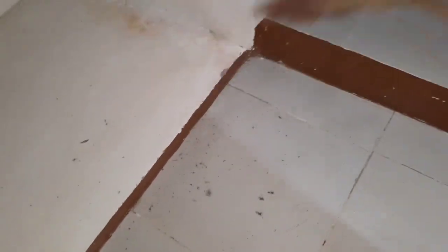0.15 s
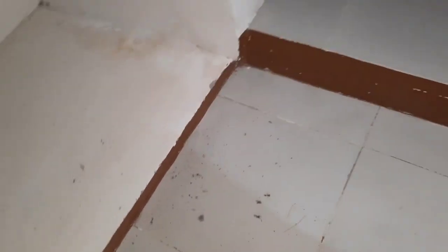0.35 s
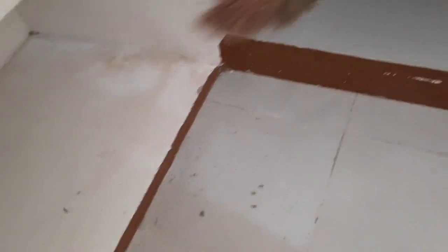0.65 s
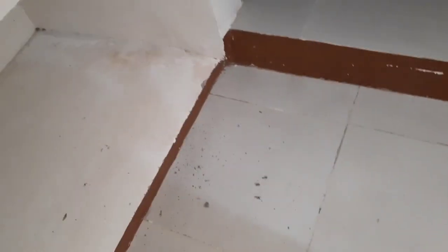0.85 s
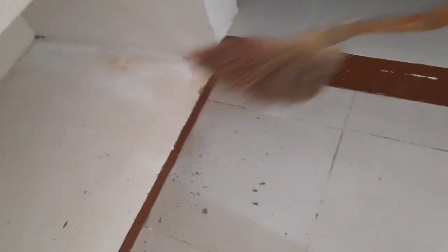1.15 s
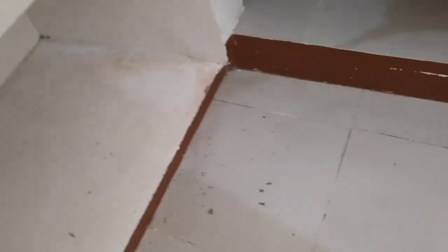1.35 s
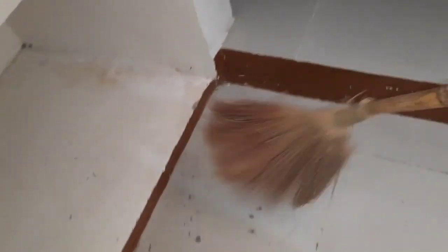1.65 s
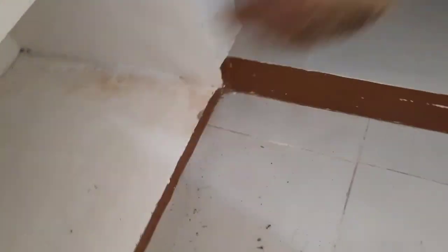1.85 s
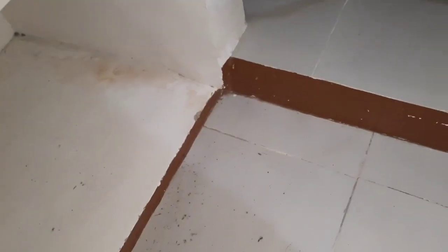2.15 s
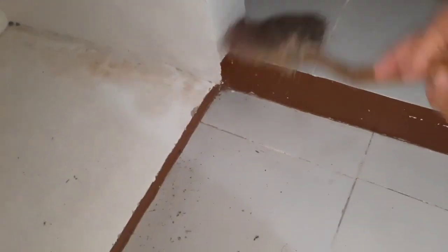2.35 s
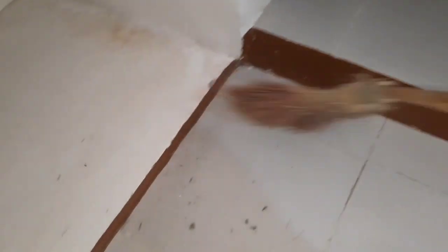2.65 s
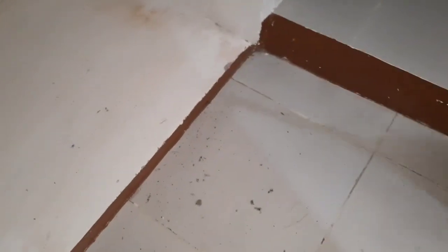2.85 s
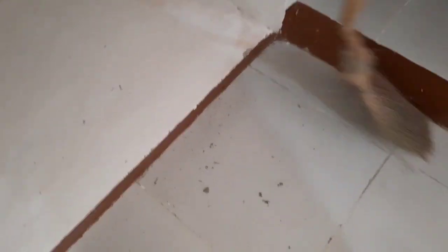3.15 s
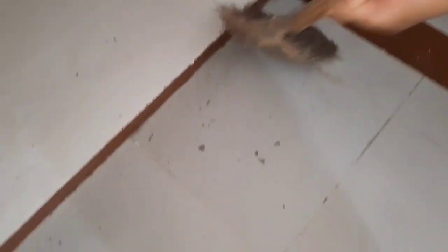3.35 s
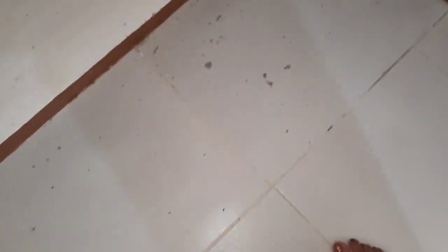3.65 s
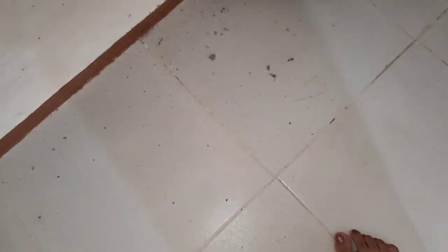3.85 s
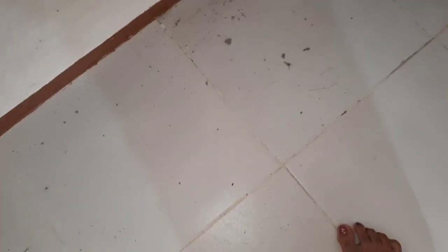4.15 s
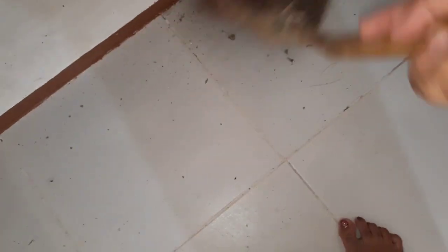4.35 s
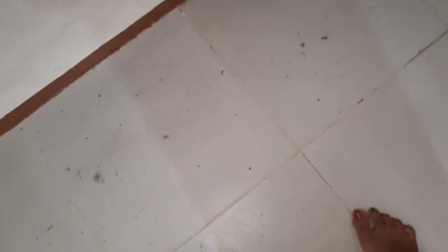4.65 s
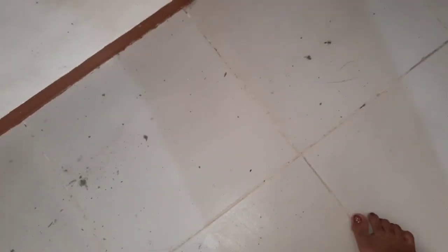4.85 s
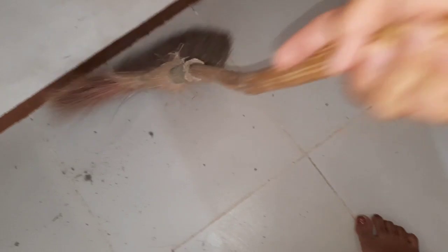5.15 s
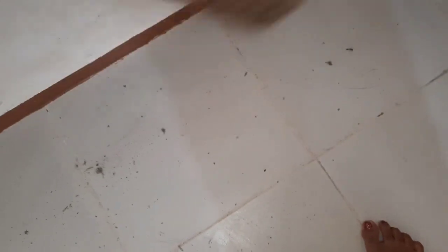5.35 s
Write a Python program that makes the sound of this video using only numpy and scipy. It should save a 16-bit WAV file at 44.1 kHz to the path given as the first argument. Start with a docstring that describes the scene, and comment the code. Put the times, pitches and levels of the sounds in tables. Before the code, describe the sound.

Uneven hissing broom strokes on tiles in a bare, reverberant room, with hollow wooden clicks and dull handling thumps close to the microphone.

```python
"""A small, bare room with a tiled corner, where a soft grass broom sweeps in uneven strokes.
Slipping fibre tips make a bright hiss (filtered noise) over a low murmur; the broom head pats down once.
The hollow handle clicks and creaks and stalks snap (decaying sines), and the room echoes (decaying noise).
The hand that holds the phone bumps and rubs beside its right microphone, over quiet house noise."""
import sys
import numpy as np
from scipy import signal
from scipy.fft import rfft, irfft
from scipy.io import wavfile

SR = 44100
rng = np.random.default_rng(int(sys.argv[2]) if len(sys.argv) > 2 else 0)


def store_wav(level_fs):
    """Save 16-bit WAV to argv[1]."""
    pcm = np.round(np.clip(np.atleast_2d(level_fs), -1, 1) * 32767)
    wavfile.write(sys.argv[1], SR, pcm.T.astype(np.int16))


N = 242978
T = np.arange(N) / SR  # time [s]

# Broom strokes, each with a steady drag and a push: (touch-down [s], contact length [s], drag level [dB],
# push middle after touch-down [s], push width [s], push level [dB], brightness [dB],
# murmur relative to drag and push [dB])
STROKE_TABLE = [ (-.02, 0.048, -50.5, 0.024, 0.0093, -48.5, -3.5, -21),
                (.421, 0.16, -55.5, 0.21, 0.09, -50, 0.5, -25),
                (.863, 0.15, -60, 0.19, 0.074, -48, -1, -17.5),
                (1.262, 0.039, -67, 0.015, 0.024, -59, -5.5, -43),
                (1.402, 0.24, -53, 0.22, 0.071, -44, 1.2, -18.5),
                (2.073, 0.44, -48.5, 0.3, 0.061, -42.5, .8, -14),
                (2.921, 0.29, -59.5, 0.21, 0.077, -40.5, 1.1, -18),
                (3.183, .25, -51, .12, 0.055, -41.5, -1, -13.5),
                (3.53, 0.046, -53, .025, .02, -56, 2.2, -20),
                (3.604, 0.3, -48.5, .01, 0.17, -44.5, .3, -28), (4.079, 0.15, -54, 0.081, .03, -58, 1, -19),
                (4.238, .26, -52.5, 0.16, .11, -43.5, 0.5, -17.5),
                (4.79, 0.047, -69, 0.029, 0.032, -58, 3.5, -9),
                (4.866, 0.42, -51.5, 0.23, 0.11, -43.5, -0.5, -26)]


def undb(db):
    """Level law: decibels to amplitude gain."""
    return 10 ** (np.asarray(db) / 20)


def unit(x):
    """Normalisation: scale to rms 1."""
    return x / np.sqrt(np.mean(x ** 2))


def fade(t, t60_s):
    """Exponential decay: amplitude falls by 60 dB in t60."""
    return np.exp(-np.log(1000) * t / t60_s)


def swell(t, width_s):
    """Gaussian envelope: a smooth rise and fall around t = 0."""
    return np.exp(-.5 * np.minimum((t / width_s) ** 2, 100))


def walk(rate):
    """Random modulation: straight lines join `rate` random values per second, spread near 1."""
    knots = rng.standard_normal(size=4000)
    return 1.2 * np.interp(T * rate, np.arange(len(knots)), knots)


def colour(x, points):
    """Spectral shaping: filter by (frequency [Hz], level [dB]) points on a log-frequency axis, to rms 1."""
    hz, db = np.transpose(points)
    f = np.maximum(np.fft.rfftfreq(x.shape[-1], 1 / SR), 1)
    gain = undb(np.interp(np.log(f), np.log(hz), db))
    return unit(irfft(rfft(x) * gain, x.shape[-1]))


def band(x, lo_hz, hi_hz):
    """Band-pass filtering: keep what lies between two frequencies."""
    return signal.sosfilt(signal.butter(2, [lo_hz, min(hi_hz, .48 * SR)], "band", fs=SR, output="sos"), x)


def lowpass(hz):
    """Second-order low-pass sections."""
    return signal.butter(2, hz, fs=SR, output="sos")


def ring(modes):
    """Modal synthesis: 0.1 s of decaying sines of (frequency [Hz], level [dB], t60 [s])."""
    t = T[:SR // 10]
    return sum(undb(db - 60 * t / t60) * np.sin(2 * np.pi * hz * t) for hz, db, t60 in modes)


def add(track, s, sound):
    """Superposition: mix a sound in at a time."""
    i = max(int(s * SR), 0)
    track[..., i:i + sound.shape[-1]] += sound[..., :N - i]


def room(x):
    """Diffuse reverberation of tiles and plaster, different at each microphone; the treble dies first."""
    t60_s, treble_t60_s, rise_s = .6, .45, 0.0017
    t, noise = T[:SR], rng.standard_normal((2, SR))
    low = signal.sosfilt(lowpass(4000), noise)
    tail = low * fade(t, t60_s) + (noise - low) * fade(t, treble_t60_s)
    tail *= np.minimum(t / rise_s, 1)
    return signal.fftconvolve(np.atleast_2d(x), unit(tail) / np.sqrt(SR), axes=1)[:, :N]


def standing_wave(x):
    """Room mode: low sounds build up a standing wave between the walls, alike at both microphones."""
    mode_hz, mode_t60_s, mode_db = 324, 0.35, 8
    t = T[:SR]
    decay = fade(t, mode_t60_s)
    mode = 2 * decay / decay.sum() * np.sin(2 * np.pi * mode_hz * t)
    return undb(mode_db) * signal.fftconvolve(x.mean(axis=0), mode)[:N]


def air(db, boom_db):
    """Partly correlated house noise; a narrow-band room resonance swells in it, alike at both microphones."""
    # Spectrum of the house noise: (frequency [Hz], level [dB])
    air_spectrum = [(15, -25), (30, 1.5), (60, 8), (120, 5), (200, -2.5), (320, 1), (480, -6), (800, -10),
                    (1300, -4), (2000, -13), (6000, -18), (15000, -19)]
    noise = rng.standard_normal((2, N)) + 0.74 * rng.standard_normal(N)
    boom = unit(band(rng.standard_normal(N), 300, 326)) * undb(boom_db + walk(4.8))
    return undb(db + .5 * walk(4.14)) * colour(noise, air_spectrum) + boom


def hand(leak_db):
    """Structure-borne sound: soft knocks and rubbing rumble reach the right microphone through the phone."""
    # The hand shifts its grip on the phone: (middle [s], width [s], level [dB])
    rubs = [(.45, 0.025, -54), (1.75, 0.13, -72), (2.147, 0.031, -37.5), (2.27, 0.049, -53.5),
            (2.6, 0.031, -48), (2.809, 0.081, -56), (3.232, .03, -40.5), (3.33, 0.033, -43.5),
            (3.76, 0.07, -37.5), (3.97, 0.053, -40.5), (4.11, 0.053, -43.5), (4.288, 0.032, -37.5),
            (4.52, 0.014, -43), (4.67, 0.053, -48), (4.892, 0.018, -42), (5.021, 0.02, -52),
            (5.409, 0.024, -50)]
    # The hand knocks the phone: (time [s], level before softening [dB], frequency [Hz])
    bumps = [(2.651, -20.5, 137), (2.679, -29.5, 72), (3.655, -27, 81), (3.722, -26.5, 122),
             (3.916, -22.5, 100), (4.573, -22, 94), (4.639, -28, 120), (4.677, -33.5, 117),
             (4.706, -29, 72)]
    # in periods of the knock: its rise and fall, and the rounding of its peak by the skin
    bump_cycles, bump_softness = 0.44, 0.1
    rumble = colour(rng.standard_normal(N), [
        (15, -62), (26, -29), (38, 0.5), (62, 9.5), (100, -1.5), (150, -9.5), (220, -29.5),
        (400, -30), (1000, -78)])
    rub_power = sum((undb(db) * swell(T - s, width)) ** 2 for s, width, db in rubs)
    right = rumble * np.sqrt(rub_power)
    for s, db, hz in bumps:
        cycles = hz * (T - s)
        envelope = np.exp(-np.hypot(cycles, bump_softness) / bump_cycles)
        right += undb(db) * envelope * np.sin(2 * np.pi * cycles)
    return np.array([undb(leak_db) * right, right])


def handle(room_db, left_db):
    """Stick-slip excites a resonator: each slip rings the hollow handle, with a crack, and chatters on.
    The handle is nearer the right microphone."""
    # Clicks and creaks: (time [s], level [dB], crack relative to click [dB], chatter t60 [s])
    clicks = [ (0.034, -39, -11, 0.033), (.094, -39, -7, 0.14), (1.269, -46.5, -11, 0.97),
              (2.294, -45.5, -22, 0.35), (2.337, -36.5, -25, 0.19), (2.437, -36.5, -28, 0.22),
              (2.746, -43.5, -3, 0.087), (3.399, -37, -23, 0.24), (3.458, -41, -26, .06),
              (3.621, -42.5, -13, .03), (3.852, -35.5, -25, 0.24), (3.872, -37, -33, 0.21),
              (4.075, -45, -26, 0.31), (4.125, -49, -20, 0.26), (4.42, -37.5, -22, 0.27),
              (4.875, -48, -16, 0.13), (5.154, -27, -26, .012), (5.3103, -27, -3, .011),
              (5.357, -48, -22, 0.067), (5.45, -49.5, 1.5, 0.077)]
    # Hollow modes, relative to the main ring: (frequency ratio [1], level [dB], t60 [s])
    hollow_modes = [(0.97, 2, 0.023), (1.042, -7.5, 0.036), (1.3, -7, 0.027)]
    # Sharp crack: (frequency [Hz], level [dB], t60 [s])
    crack_modes = [(2070, -3, 0.0069), (3200, 5, 0.002), (5900, 3.5, 0.003), (6830, -1, 0.0076),
                   (13100, -3, 0.0036)]
    main_hz, spread = 1422, 0.026  # the pitch varies a little from slip to slip
    chatter_per_s, left_delay_s = 500, .00022
    dry, t = np.zeros(N), T[:SR // 4]
    for s, db, crack_db, chatter_s in clicks:
        hz = main_hz * (1 + spread * rng.standard_normal())
        slips = (rng.random(len(t)) < chatter_per_s / SR) * .4 * rng.standard_normal(len(t))
        slips *= fade(t, chatter_s) * (t > .004)
        slips[0] = 1  # the click itself
        modes = [(hz * ratio, mode_db, t60) for ratio, mode_db, t60 in hollow_modes]
        hollow = band(ring(modes), 1365, 1730)
        add(dry, s, undb(db) * signal.fftconvolve(slips, hollow))
        add(dry, s, undb(db + crack_db) * band(ring(crack_modes), 1560, 15000))
    late = np.interp(T - left_delay_s, T, dry)
    return np.array([undb(left_db) * late, dry]) + undb(room_db) * room(dry)


def stalks(room_db):
    """Free vibration after release: stiff stalks flick free with a short, high tick of two modes."""
    # Snaps of single stalks: (time [s], level [dB], reference frequency just below both modes [Hz])
    snaps = [(.095, -49, 3160), (0.6252, -40.5, 3030), (1.022, -40, 3610), (2.361, -36, 6700),
             (2.365, -28.5, 11600)]
    dry = np.zeros(N)
    for s, db, hz in snaps:
        tick = ring([(hz * 1.094, -4, .012), (hz * 1.01, -5, .009)])
        add(dry, s, undb(db) * band(tick, hz * .75, hz * 1.3))
    return dry + undb(room_db) * room(dry)


def pat():
    """Impact excitation: the broom head lands flat once and stirs the low resonances of the room."""
    start_s, rise_s, t60_s, level_db = 3.618, 0.0052, 0.7, -49
    thud = colour(rng.standard_normal((2, N)), [
        (25, -18), (60, -10), (140, 6), (220, -16), (320, 4), (400, -3), (500, -4.5), (650, -10),
        (1200, -9), (4000, -22)])
    age = np.maximum(T - start_s, 0)
    return thud * np.minimum(age / rise_s, 1) * fade(age, t60_s) * undb(level_db)


def stroke(s, length_s, drag_db, after_s, width_s, push_db, t60_s):
    """Friction envelope: quick attack, steady drag with a push on top, fade through the room after lift-off."""
    attack_s = .016  # the fibres settle on the tiles within this time
    age, level = T[:2 * SR], np.zeros(N)
    push = undb(push_db) * swell(np.minimum(age, length_s) - after_s, width_s)
    release = fade(np.maximum(age - length_s, 0), t60_s)
    shape = np.minimum(age / attack_s, 1) * np.hypot(undb(drag_db), push) * release
    add(level, s, shape[max(int(-s * SR), 0):])  # a stroke may already be under way at time 0
    return level


def body():
    """Forced vibration: the pressed bundle of grass murmurs low with the swish; the room holds these lows."""
    murmur_t60_s = 0.91
    power = sum((undb(murmur_db) * stroke(*shape, murmur_t60_s)) ** 2
                for *shape, _, murmur_db in STROKE_TABLE)
    drive = rng.standard_normal(N) * np.sqrt(power)
    murmur = np.std(drive) * colour(drive, [
        (40, 0.5), (130, 1), (220, -18), (315, -3), (420, -3.0), (650, -13.0), (1000, -12), (3000, -68)])
    return undb(-5.5) * murmur + undb(-9) * room(murmur)


def fibres(rate, spread_db):
    """Random impulse process: tiny slips of fibre tips at random moments, many faint, a few strong."""
    slips = (rng.random((2, N)) < rate / SR) * rng.standard_normal((2, N))
    return unit(slips * undb(spread_db * np.minimum(rng.exponential(size=(2, N)), 5)))


def broom():
    """Friction noise: slipping fibres merge into a hiss; bunches catch and let go, faster tips sound brighter."""
    # Spectrum of the swish: (frequency [Hz], level [dB])
    swish_spectrum = [(150, -78), (250, -35), (308, -5), (354, -29), (467, -10), (536, -19), (708, -14.5),
                      (1060, -8), (2080, -1), (3090, -1), (6090, -1), (7620, -3.5), (12800, 1), (15000, 1),
                      (15800, -9.5)]
    # Low, middle and top range: (gain [dB], share of the stroke's brightness [1],
    # extra level of the push [dB], t60 after lift-off [s])
    ranges = [(0.5, -0.94, -3.5, 0.67), (0.5, 1, 0, 0.6), (1, 0.36, -0.1, .48)]
    flutter_db, flutter_per_s = .45, 30
    grains = undb(-5) * fibres(rate=5000, spread_db=2.0)
    hiss = colour(rng.standard_normal((2, N)) + grains, swish_spectrum)
    low = signal.sosfiltfilt(lowpass(4800), hiss)
    top = signal.sosfiltfilt(signal.butter(3, 9500, "high", fs=SR, output="sos"), hiss)
    middle = hiss - low - top
    swish = 0
    for part, (db, share, extra_db, t60) in zip((low, middle, top), ranges):
        power = sum((undb(share * bright) * stroke(s, length, drag, after, width, push + extra_db, t60)) ** 2
                    for s, length, drag, after, width, push, bright, _ in STROKE_TABLE)
        swish = swish + part * np.sqrt(power) * undb(db + .5 * walk(35))
    return swish * undb(flutter_db * walk(flutter_per_s))


def scene():
    """Superposition of all sources in the room."""
    lows = body() + pat()
    broom_head = broom() + lows + standing_wave(lows) + stalks(room_db=-5)
    clicks = handle(room_db=-11, left_db=-5)
    return air(db=-68.5, boom_db=-82.5) + hand(leak_db=-41) + clicks + broom_head


def record(dry):
    """Band limiting: a steep low-pass, as the phone cuts the top."""
    top_hz = 15850
    return signal.sosfilt(signal.ellip(10, .2, 70, top_hz, fs=SR, output="sos"), dry)


dry = scene()
out = record(dry)
store_wav(out)
```